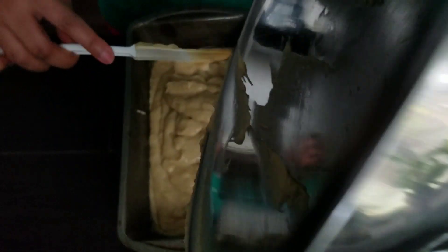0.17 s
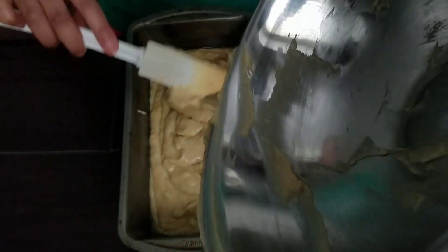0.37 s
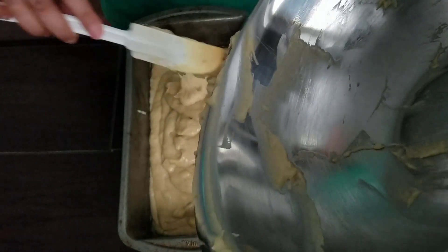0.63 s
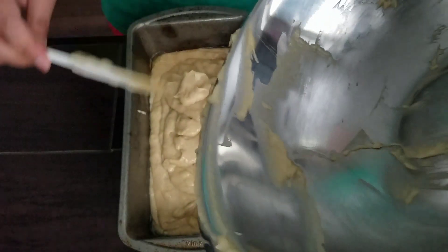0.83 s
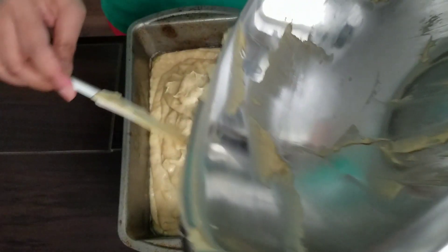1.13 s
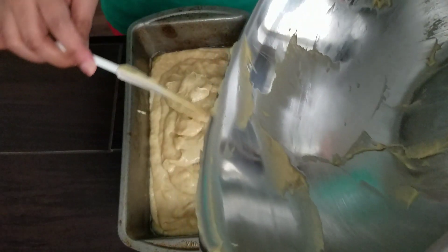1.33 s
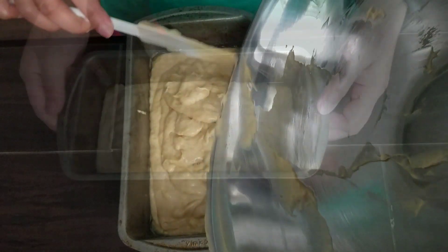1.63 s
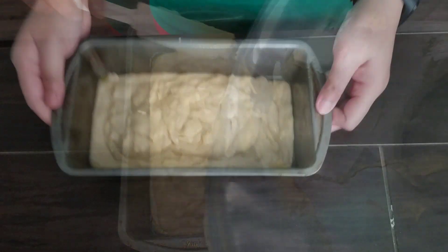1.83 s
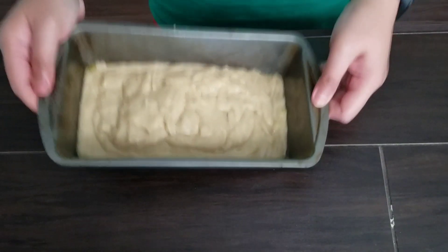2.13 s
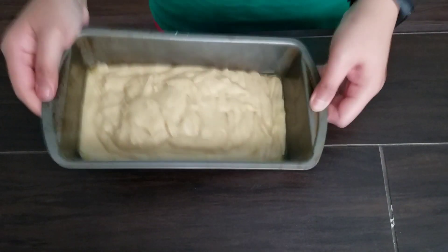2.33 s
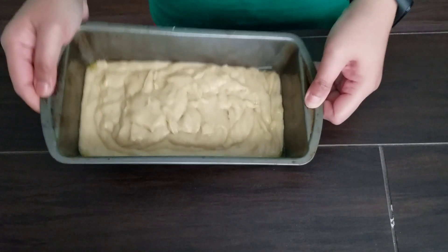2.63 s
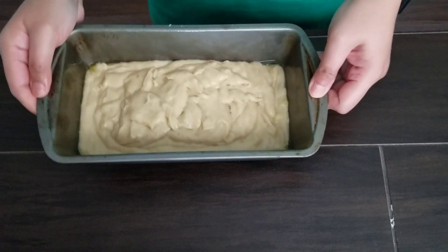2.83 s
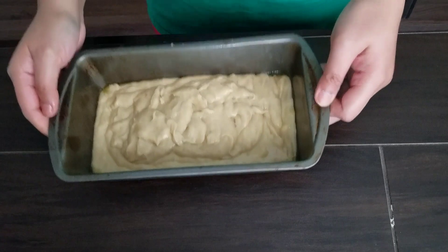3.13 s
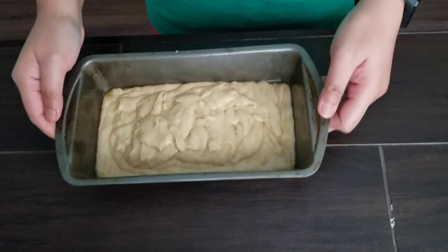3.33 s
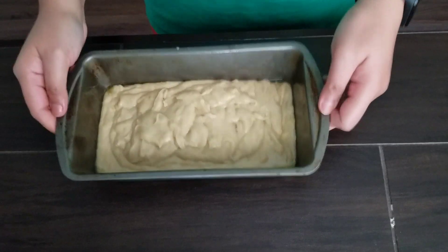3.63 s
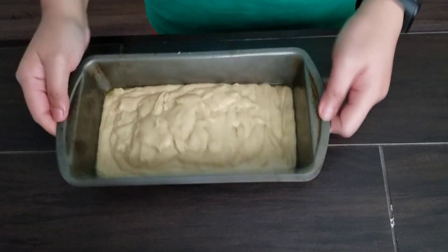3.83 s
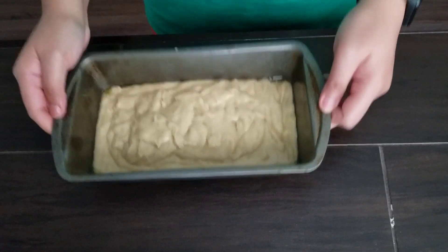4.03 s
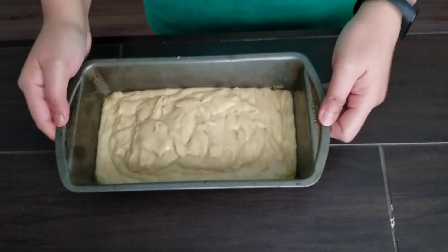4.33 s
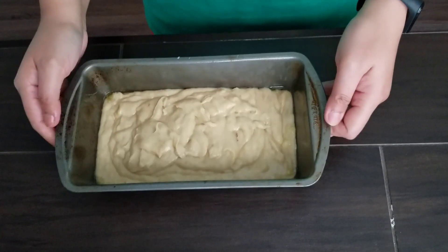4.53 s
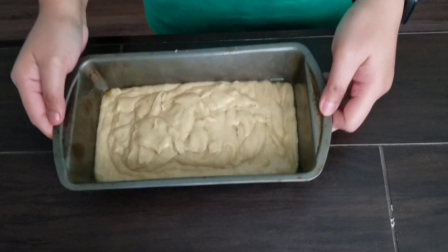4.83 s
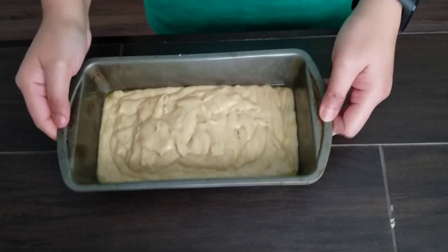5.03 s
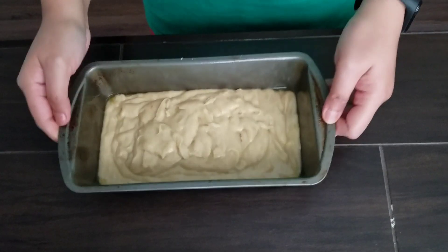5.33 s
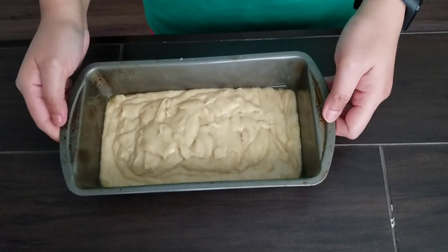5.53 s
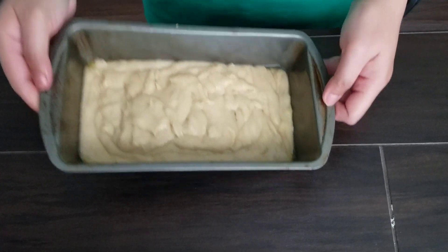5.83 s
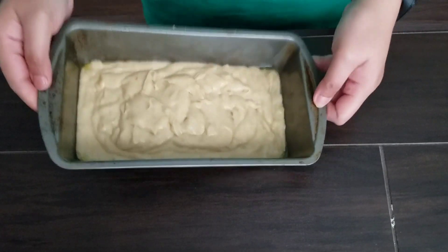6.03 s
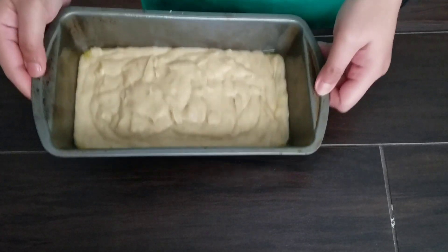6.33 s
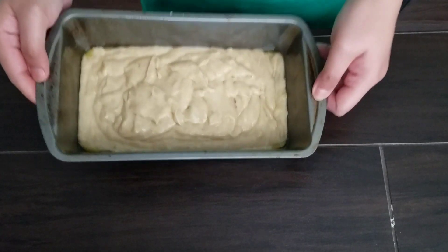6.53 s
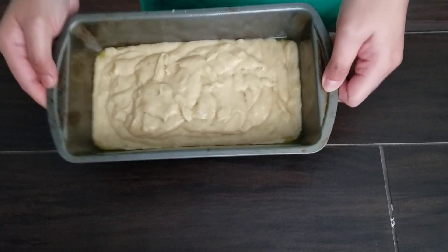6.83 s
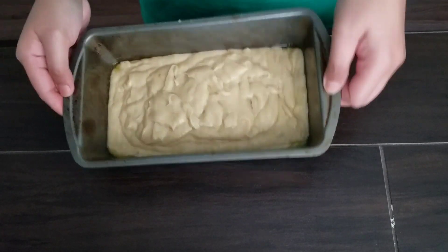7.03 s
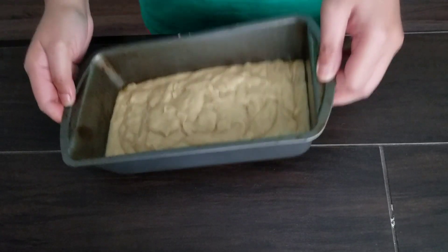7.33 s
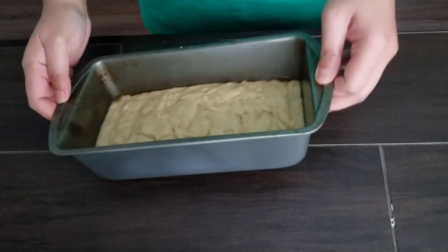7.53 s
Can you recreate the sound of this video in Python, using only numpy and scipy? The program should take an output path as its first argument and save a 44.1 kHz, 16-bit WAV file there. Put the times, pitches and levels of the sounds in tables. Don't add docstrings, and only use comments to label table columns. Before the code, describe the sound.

Quiet, wet spatula strokes and a small bowl tap open the scene beneath a humming appliance. From two seconds, loud metal pan knocks take over: three, then a clattery run with double hits and rebounds, a pair with faint settling taps, and two groups of three. Batter chokes the ringing; hard kitchen surfaces answer with brief bright reverberation. Close, slightly saturated stereo pickup from above.

```python
import sys
import numpy as np
from scipy import signal
from scipy.fft import rfft, irfft
from scipy.io import wavfile
from scipy.ndimage import uniform_filter1d

SR = 44100
rng = np.random.default_rng(int(sys.argv[2]) if len(sys.argv) > 2 else 0)


def gain_from_db(level_db):
    decades = np.asarray(level_db, float) / 20
    return 10 ** decades


def unload_audio(sound):
    columns = np.transpose(np.atleast_2d(sound))
    steps = np.round(np.clip(columns, -1, 1) * 32767)
    wavfile.write(sys.argv[1], SR, steps.astype(np.int16))


N = 338688
T = np.arange(N) / SR

# start_s, thud_db, clack_db, crack_db, body_db
SPOTS = [
    (1.9, -37.5, -21.5, -30.5, -1.5),
    (3.1, -22, -24, -25.5, -1.5),
    (4.9, -22, -22.5, -27, -1.5),
    (5.8, -26.5, -24, -44, -2),
    (6.8, -25, -21.5, -40, -2),
]


def colour(points, size, click=False):
    hz, db = np.transpose(points)
    bins_hz = np.maximum(np.arange(size // 2 + 1) * SR / size, 1)
    gain = gain_from_db(np.interp(np.log(bins_hz), np.log(hz), db))
    if click:
        x = np.roll(irfft(gain, size), 40)
        return x / np.sqrt(np.sum(x ** 2))
    x = irfft(rfft(rng.standard_normal(size)) * gain, size)
    return x / x.std()


def narrow(hz, width_hz, skirt_db, foot_db):
    return [(hz - 4 * width_hz, foot_db), (hz - width_hz, skirt_db), (hz, 0),
            (hz + width_hz, skirt_db), (hz + 4 * width_hz, foot_db)]


def stereo(mid, side, like):
    return np.sqrt(1 + like) * mid + np.sqrt(1 - like) * side * np.array([[1], [-1]])


def pair(points, like):
    mid, side = colour(points, N), colour(points, N)
    return stereo(mid, side, np.clip(like, 0, 1)) / np.sqrt(2)


def walk(rate_hz):
    k = int(SR / rate_hz)
    held = np.repeat(rng.standard_normal(N // k + 1), k)
    return uniform_filter1d(uniform_filter1d(held, k), k)[:N]


def modes(table, t, scatter_db=0., detune=0.):
    hz, db, t60 = np.transpose(table)[:, :, None]
    level_chance, pitch_chance = rng.standard_normal((2, len(table), 1))
    level = gain_from_db(db + scatter_db * level_chance - 60 * t / t60)
    return np.sum(level * np.sin(2 * np.pi * hz * (1 + detune * pitch_chance) * t), axis=0)


def add(track, s, x):
    i = int(s * SR)
    track[i:i + len(x)] += x[:N - i]


def room_tone():
    # pitch_hz, level_db
    fridge = [(204.6, -70), (355.3, -72), (1087, -76), (2116, -80), (4190, -84)]
    # time_s, level_db
    floor_levels = [(0, -59), (1.9, -58), (2.9, -66), (4.5, -73), (5.2, -59), (5.5, -53), (6.8, -52), (7.68, -51)]
    # pitch_hz, level_db (per Hz)
    air = [(90, -39.5), (150, 1.5), (220, -2.5), (380, -4), (860, -12.5), (1300, -18), (2200, -20),
           (4000, -30), (6000, -34.5), (15500, -40.5), (16500, -55.5)]
    rumble = [(15, -34.0), (30, -13.5), (60, -15.5), (120, -7.0), (170, -28), (400, -77.0)]
    mains_hz, rumble_db, rumble_share, air_db, air_share = 60, -62.5, 0.1, -58.5, 0.04
    lift_s, lift_db = 6.8, 8

    lines = sum(gain_from_db(db + 4 * walk(12)) * np.sin(2 * np.pi * hz * T + 1.5 * walk(10)) for hz, db in fridge)
    drone_db = np.interp(T, *np.transpose(floor_levels))
    drone_rise_db = drone_db - floor_levels[0][1]
    mains = gain_from_db(drone_db + 3 * walk(3)) * np.sin(2 * np.pi * mains_hz * T)
    rumble_db = rumble_db + rumble_share * drone_rise_db
    air_db = air_db + air_share * drone_rise_db + lift_db * np.clip((T - lift_s) / 0.11, 0, 1)
    low_air = pair(rumble, 0.95) * gain_from_db(rumble_db)
    return pair(air, 0.63) * gain_from_db(air_db + 3.1 * walk(7.2)) + lines + mains + low_air


def surfaces(x):
    # delay_s, left_db, right_db
    echoes = [(.0024, -4, -13.5), (.0054, -2.5, -26.5), (.008, -14, -17), (.0101, -12, -6),
              (.015, -17.5, -22), (.025, -9, -6)]
    return sum(gain_from_db(np.array([[left_db], [right_db]])) * np.roll(x, int(s * SR)) for s, left_db, right_db in echoes)


def kitchen(size=32768):
    # pitch_hz, level_db, t60_s, likeness (left to right, 0-1)
    bands = [(237, -26.5, 0.62, 1), (312, -25.5, 0.57, .85), (416, -25.5, 0.57, 0.94),
             (528, -30.5, 0.65, 0.6), (842, -36, 0.62, 0.27), (1160, -31, 0.64, 0), (1990, -27, 0.68, 0),
             (2180, -26.5, 0.7, 0), (3400, -24.5, 0.65, 0), (5100, -26, 0.62, 0), (7700, -30, 0.52, 0.02),
             (12900, -33, .42, 0.01)]
    t = np.arange(size) / SR
    out = np.zeros((2, size))
    centres = np.array(bands)[:, 0]
    centres = np.r_[centres[0] / 2, centres, SR / 2]
    for k, (_, db, t60, like) in enumerate(bands):
        below, hz, above = centres[k:k + 3]
        band = [(below / 2, -80), (below, -25), (np.sqrt(below * hz), -3), (hz, 0),
                (np.sqrt(above * hz), -3), (above, -25), (above * 2, -80)]
        mid, side = colour(band, size), colour(band, size)
        both = stereo(mid, side, np.clip(like, -1, 1))
        out += both * np.sqrt(hz / SR) * gain_from_db(db - 60 * t / t60)
    out *= 1 + 5.0 * np.exp(-t / 0.0082)
    return out * np.clip(t / .012, 0, 1)


def echo(x):
    out = np.zeros((N, 2))
    moves = [spot[0] for spot in SPOTS]
    for start, stop in zip(moves, moves[1:] + [N / SR]):
        blows = x[None, int(start * SR):int(stop * SR)]
        add(out, start, signal.fftconvolve(blows, kitchen(), axes=1).T)
    return out.T


def mixing():
    # pitch_hz, level_db (per Hz)
    hum = [(18, -38.5), (30, -19), (46, -3.5), (113, 4), (166, -12.5), (200, 3.5), (267, -9), (356, 0.5),
           (420, -16.5), (550, -13.5), (920, -120)]
    drag = [(160, -46), (280, -30.5), (379, -17), (406, 1), (506, -2.5), (669, -3), (905, -4.5),
            (1030, -10.5), (1120, -8.5), (1240, -11), (4500, -36), (5850, -70), (9900, -120)]
    hiss = [(1290, -28), (2200, -6.5), (2490, -13.5), (2820, -3), (3390, -11.5), (3810, -14.5),
            (6640, -16.5), (7450, -20), (9560, -20.5), (14800, -15.5), (16000, -25)]
    # pitch_hz, width_hz, level_db (over the hum)
    motor_lines = [(110.8, 6, -10), (212, 6.2, -5), (367, 21, -12.5), (410, 12, -9.5)]
    # start_s, attack_s, level_db, release_db_per_s
    strokes = [
        (0.2, 0.18, -47.5, 21),
        (1.01, 0.0075, -45, 115),
        (1.27, 0.043, -41, 20.5),
    ]
    hum_db, hiss_db, drag_db = -52.5, -71, -56.5
    fade_s, fade_db_s = 1.495, 31
    stroke_hiss = 0.085

    fade_db = -fade_db_s * np.maximum(T - fade_s, 0)
    rises_db = [0 * T]
    for s, attack, db, fall in strokes:
        onset = np.clip((T - s) / attack, 0, 1)
        rises_db.append(onset * (db - drag_db) - fall * np.maximum(T - s - attack, 0))
    rise_db = np.max(rises_db, axis=0)
    motor = sum(gain_from_db(db) * colour(narrow(hz, width, -10, -60), N) for hz, width, db in motor_lines)
    humming = (pair(hum, 0.98) + motor) * gain_from_db(hum_db + fade_db + 2.0)
    dragging = pair(drag, 0.085) * gain_from_db(drag_db + rise_db + fade_db + 2.0 * walk(30))
    hissing = pair(hiss, 0.1) * gain_from_db(hiss_db + stroke_hiss * rise_db + fade_db / 2 + 7.5)
    return humming + dragging + hissing


def bowl():
    # pitch_hz, level_db, t60_s
    bowl_modes = [(526, -7, 0.051), (560, 12, 0.041), (580, 5, 0.17), (867, -2.5, 0.24), (1025, 3, 0.07),
                  (1075, 0.5, 0.27), (1650, -3, 0.04), (1790, -6, 0.057), (3380, -17, .04),
                  (5530, -11, 0.038)]
    # start_s, length_s, pitch_hz, width_hz, level_db
    rubs = [
        (0.205, .1, 750, 60, -52),
        (.6, .11, 720, 60, -55),
        (1.025, .09, 13500, 700, -63),
    ]
    tap_s, tap_db = 1.0175, -42
    rock_s, rock_attack_s, rock_hold_s, rock_release_s = 1.05, 0.086, 0.11, .055
    rock_db, rock_edge_db, rock_hz, rock_sag_hz_s = -45.5, -23, 64.6, 25

    out = np.zeros(N)
    add(out, tap_s, gain_from_db(tap_db) * modes(bowl_modes, np.arange(SR // 2) / SR))
    for s, length, hz, width, db in rubs:
        size = int(length * SR)
        singing = colour(narrow(hz, width, -15, -70), size=16384)[:size]
        add(out, s, gain_from_db(db) * np.hanning(size) * singing)
    s = rock_s + np.cumsum([0, rock_attack_s, rock_hold_s, rock_release_s])
    db = rock_db + np.interp(T, s, [rock_edge_db, 0, 0, rock_edge_db], -120, -120)
    phase = 2 * np.pi * np.cumsum(rock_hz - rock_sag_hz_s * (T - rock_s)) / SR
    return out + gain_from_db(db + 8.5) * (np.sin(phase) + 0.34 * np.cos(2 * phase + .5))


def contacts():
    # start_s, peak_db, pitch_hz, sharpness_db
    knocks = [(2.0174, -1.5, 767, 0), (2.3035, 2.5, 867, -0.5), (2.5241, 0, 841, 1),
              (3.1591, -4, 659, -2.5), (3.5225, -0.5, 700, -0.8), (3.7961, -2, 759, -3),
              (4.0335, -5, 645, 1.5), (4.2640, -4, 686, -3.5), (4.9795, -1, 677, 4.5), (5.2096, 1, 748, -1),
              (5.9325, -0.5, 893, 3.5), (6.1770, -2.5, 907, 2.7), (6.3933, -1.5, 930, 1.5),
              (6.9010, -3, 920, 1.3), (7.0920, -1, 917, -1), (7.3277, -3.5, 914, -1.5)]
    # start_s, peak_db, clack_db (over the spot's)
    far_edges = [(2.0412, -15.5, 9), (3.1715, -4, 11), (3.5390, 1.5, 5.5), (3.8082, -2, 2.5),
                 (4.0395, -2.5, 3), (4.2712, -0.5, 5), (4.9852, -2, -6.5), (5.2173, -7, 11.5),
                 (6.3995, -22.5, 15.5)]
    # start_s, peak_db, pitch_hz, sharpness_db
    rebounds = [(3.169, -19, 813, 16), (3.1772, -11.5, 654, 0), (3.1909, -6, 635, -19),
                (3.2093, -21, 690, 2), (3.2198, -11, 810, 6), (3.2684, -9, 760, -2),
                (5.3526, -25, 710, 6.5), (5.358, -34, 692, 10), (5.364, -26.5, 705, 11.5),
                (5.3437, -15, 730, -10), (5.412, -25, 700, -9), (5.5632, -32, 690, -15),
                (5.5985, -37, 700, -12), (7.4577, -18.5, 850, -11)]
    far_hz, far_thud_db, far_crack_db = 813, 4.5, 3.5

    rows = [(s, db, hz, 0, sharp_db, sharp_db) for s, db, hz, sharp_db in knocks]
    rows += [(s, db, far_hz, far_thud_db, clack_db, far_crack_db) for s, db, clack_db in far_edges]
    rows += [(s, db, hz, 0, sharp_db, sharp_db) for s, db, hz, sharp_db in rebounds]
    for s, db, hz, *extra_db in rows:
        spot = [row for row in SPOTS if row[0] <= s][-1]
        yield (s, db, hz, *np.add(spot[1:4], extra_db), spot[4])


def pan():
    # pitch_hz, level_db, t60_s
    body_modes = [(345, -21, .1), (400, -15, .12), (422, -17, .1), (525, -21, .08), (631, -21, .07),
                  (717, -19, .07), (1031, -21, .07), (1156, -20, .08)]
    # pitch_hz, level_db, t60_s
    slab_modes = [(40, -6, 0.41), (61.4, -7.5, 0.39), (76, -18.5, 0.05), (88, -0.5, 0.34), (108, -9, 0.76),
                  (130.1, 0.5, 0.47), (137.4, -1.5, 0.47), (171.8, -9, 0.86), (205, -4, 0.37),
                  (249.7, -14, 0.54)]
    # pitch_hz, level_db (per Hz)
    clack_points = [(700, -30.5), (1400, 6), (2200, 1.5), (3500, -10.5), (6000, -25), (8000, -28)]
    # pitch_hz, level_db (per Hz)
    crack_points = [(4000, -16.5), (6500, -9), (9000, -7.5), (14500, -1), (15800, 2), (17000, -25.5)]
    edge_rise_s = 0.00042
    slab_damp_db_s = 33

    t = np.arange(SR // 3) / SR
    grit_t = t[:1024]
    size = len(grit_t)
    hollow, body, thud, burst, click = np.zeros((5, N))
    clack = colour(clack_points, size, click=True)
    crack = colour(crack_points, size, click=True)
    swell = (1 - np.exp(-t / 0.0042)) * np.cos(np.pi / 2 * t / t[-1])
    bite = 1 - np.exp(-grit_t / edge_rise_s)
    for s, peak_db, hz, thud_db, clack_db, crack_db, body_db in contacts():
        cycles = grit_t * hz
        damping = np.exp(-(cycles / (1.55 * (hz / 800) ** 1.7)) ** 2.2)
        ring = (1 - np.exp(-cycles / 0.21)) * damping * np.sin(2 * np.pi * cycles)
        add(hollow, s, -gain_from_db(peak_db - 1.0) * ring)
        near = gain_from_db(clack_db + 8.0) * colour(clack_points, size) * np.exp(-grit_t / 0.0024)
        near += gain_from_db(crack_db + 9.5) * colour(crack_points, size) * np.exp(-grit_t / 0.0018)
        add(burst, s, gain_from_db(peak_db) * bite * near)
        add(click, s, gain_from_db(peak_db) * (gain_from_db(clack_db + 11) * clack + gain_from_db(crack_db + 15) * crack))
        slab_level = gain_from_db(peak_db + thud_db - 1.43 - slab_damp_db_s * t)
        add(thud, s, -slab_level * swell * modes(slab_modes, t, scatter_db=4.0, detune=0.033))
        body_level = gain_from_db(peak_db + body_db)
        add(body, s, -body_level * swell * modes(body_modes, t, scatter_db=6.5, detune=0.03))
    return hollow, body, thud, burst, click


def scene():
    direct_db = 3.5
    hollow, body, thud, burst, click = pan()
    lean = gain_from_db(np.array([[.9], [-.9]]))
    thin = signal.sosfilt(signal.butter(3, 280, "high", fs=SR, output="sos"), hollow)
    sideways = signal.sosfilt(signal.butter(3, 1700, fs=SR, output="sos"), thin)
    edge = np.array([np.roll(burst, 1), gain_from_db(-1.5) * burst])
    slab = np.array([thud, np.roll(thud, 22)])
    room = surfaces(thin) + echo(sideways + click + gain_from_db(-13.5) * body)
    return lean * (gain_from_db(direct_db) * thin + edge + body + slab + room + bowl() + mixing() + room_tone())


def roll_off(x):
    return signal.sosfilt(signal.butter(12, 16990, fs=SR, output="sos"), x)


def record(dry):
    heard = signal.sosfilt(signal.ellip(4, .5, 14, 16000, fs=SR, output="sos"), dry)
    heard = signal.sosfilt(signal.butter(2, 36, "high", fs=SR, output="sos"), heard)
    return roll_off(np.tanh(0.76 * heard) / 0.91)


dry = scene()
out = record(dry)
unload_audio(out)
```